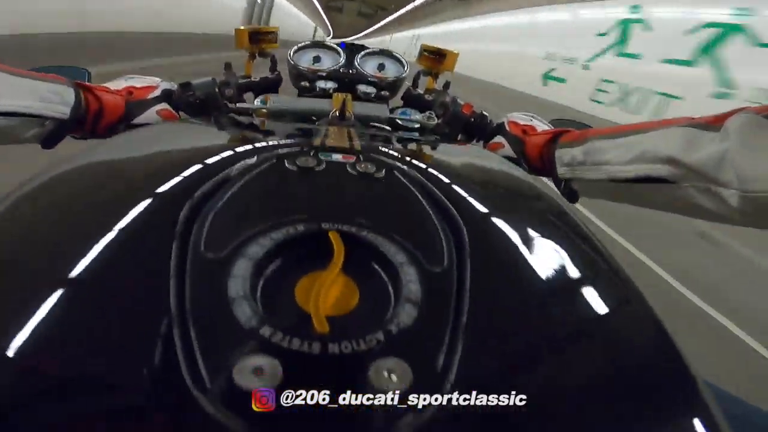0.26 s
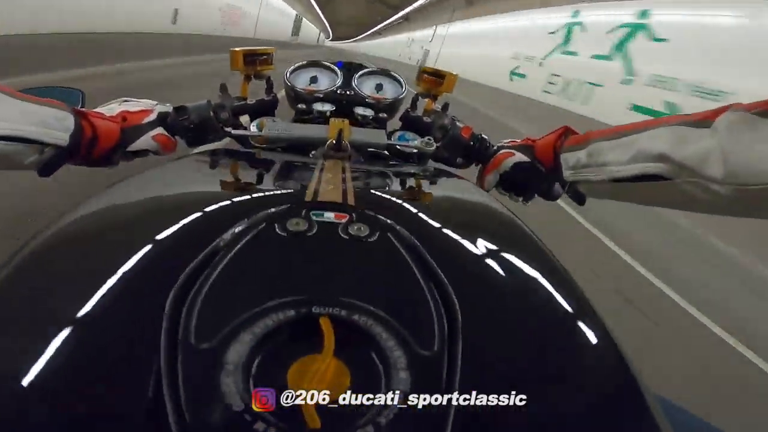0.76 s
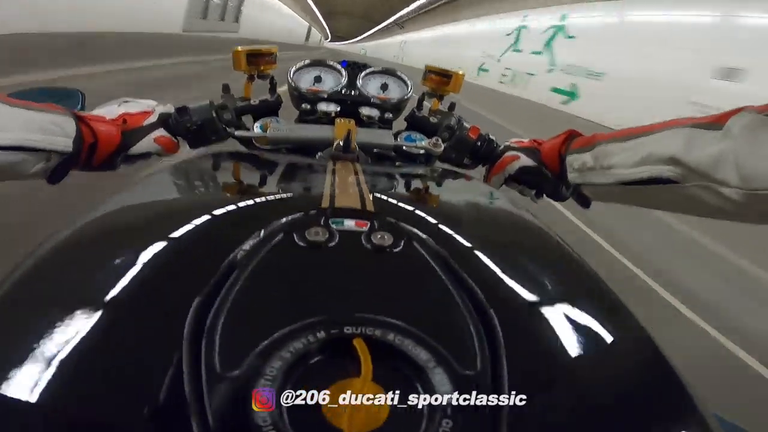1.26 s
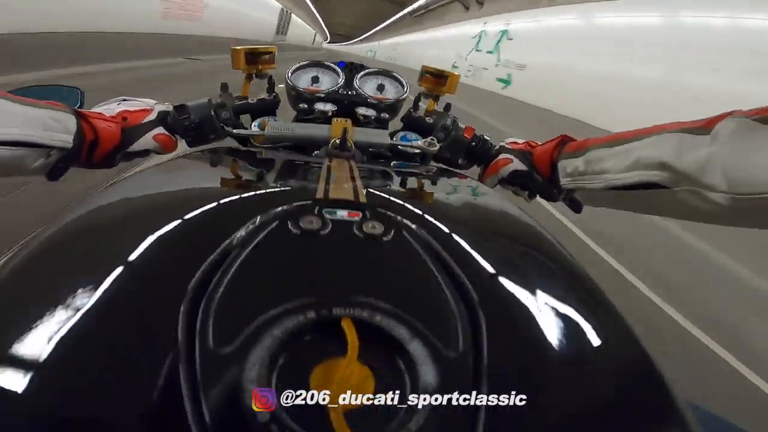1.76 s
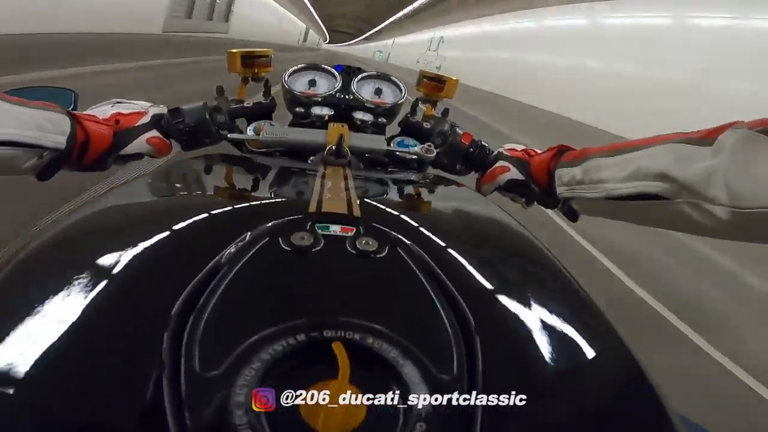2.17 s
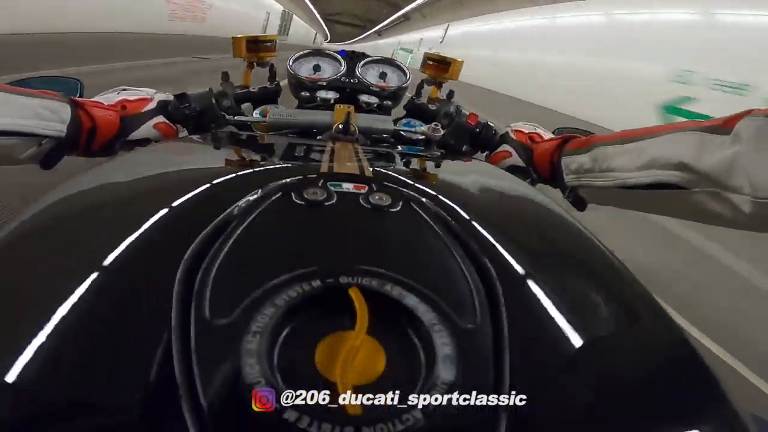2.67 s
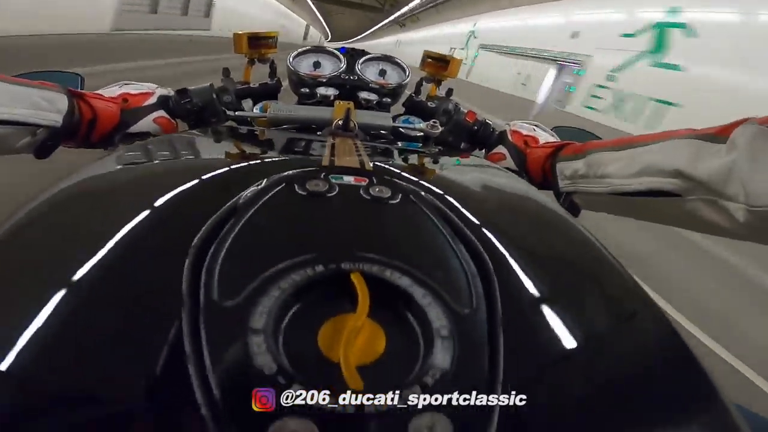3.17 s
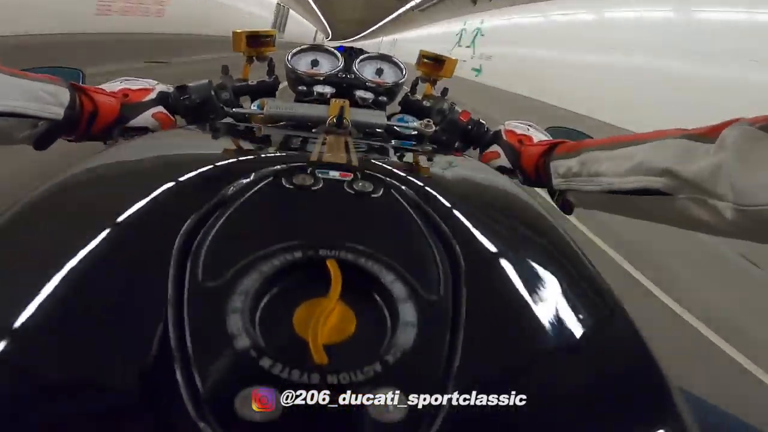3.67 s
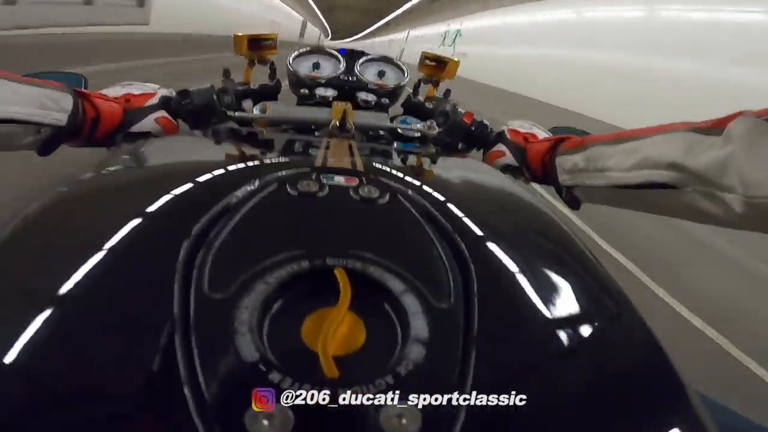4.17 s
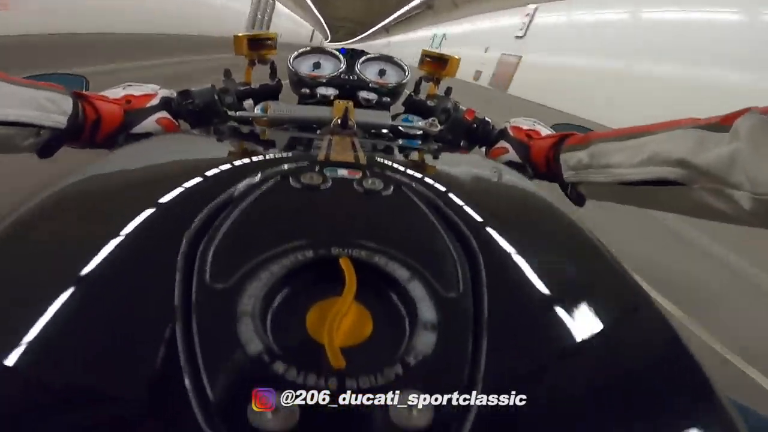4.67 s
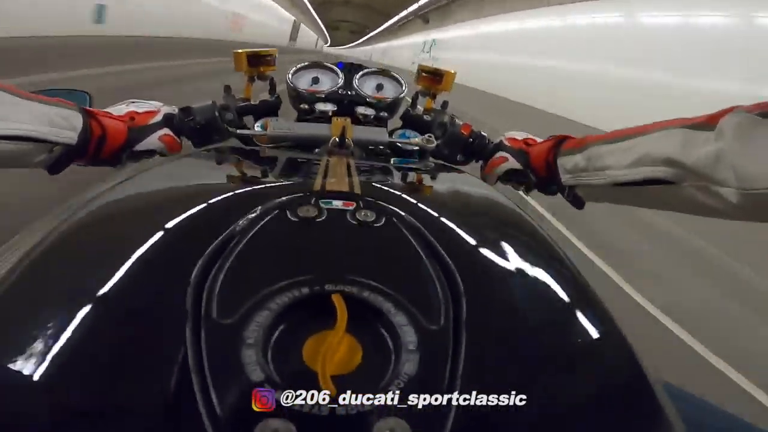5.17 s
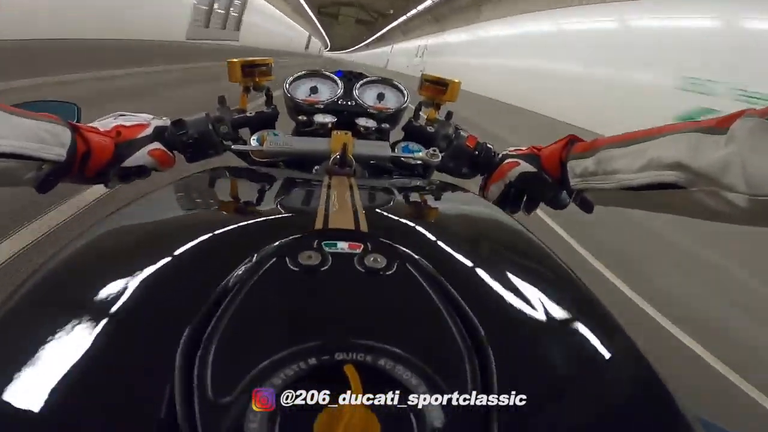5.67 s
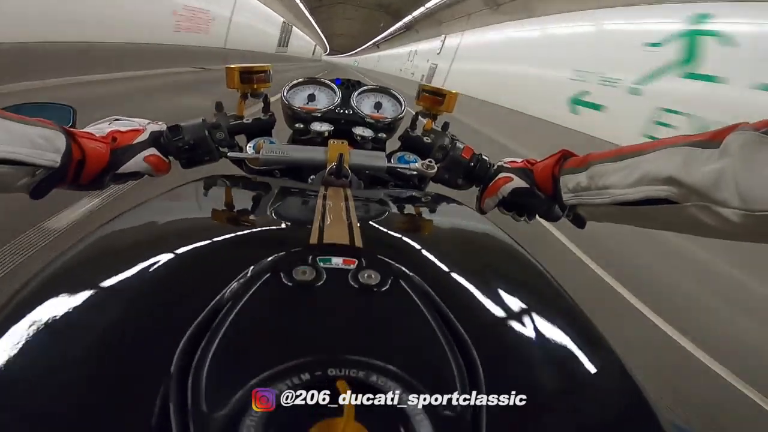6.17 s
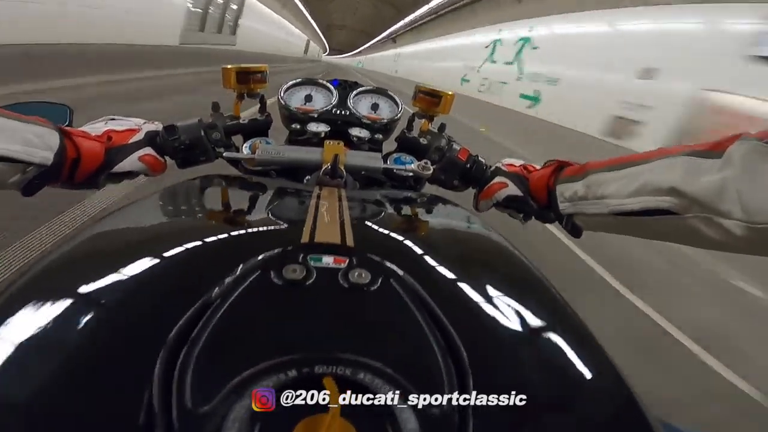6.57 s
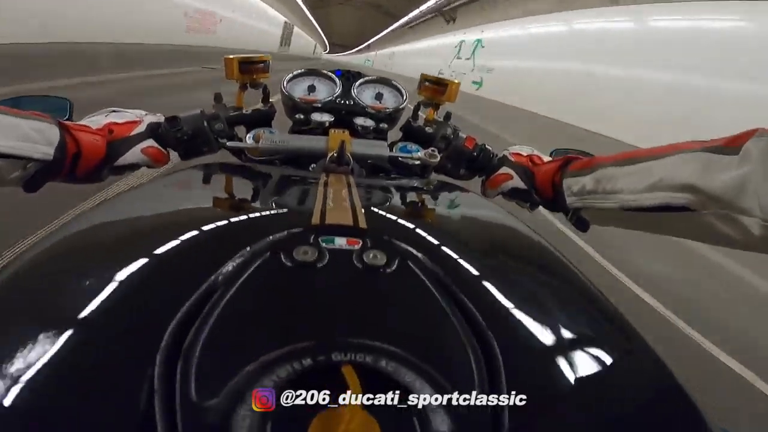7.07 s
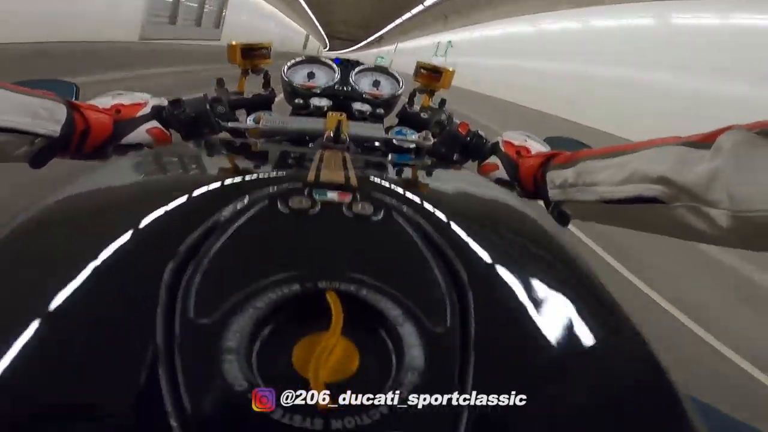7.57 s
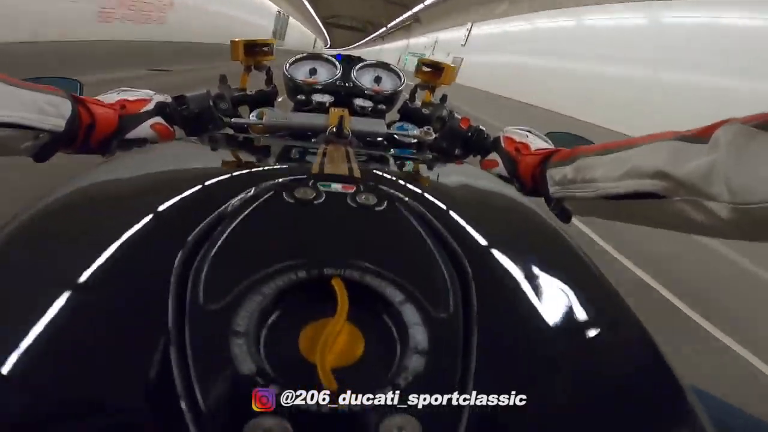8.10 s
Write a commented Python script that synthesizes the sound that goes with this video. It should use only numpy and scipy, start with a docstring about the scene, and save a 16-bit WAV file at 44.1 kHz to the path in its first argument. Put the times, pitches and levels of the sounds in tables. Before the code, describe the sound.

A twin-cylinder motorcycle surges on and off the throttle in a road tunnel, raspy and droning, with exhaust pops, wind buffeting and tyre roar.

```python
"""In a road tunnel, a four-stroke V-twin motorcycle rolls on and off the throttle at speed, heard over the tank.
Engine orders are sines gliding with the revs; gated, crackling noise makes each firing rasp in the exhaust.
Shaped noise makes the wind, the tyre roar and the engine's wash off the walls.
The tunnel booms on one low tone with its octave; filtered clicks make sharp exhaust pops."""
import sys
import numpy as np
from scipy import signal
from scipy.fft import rfft, irfft
from scipy.io import wavfile
from scipy.ndimage import uniform_filter1d

SR = 44100
rng = np.random.default_rng(int(sys.argv[2]) if len(sys.argv) > 2 else 0)


def master_out(mix):
    """Clip the mix to full scale and print it as 16-bit PCM to the path in sys.argv[1]."""
    frames = np.transpose(np.atleast_2d(mix))
    ceiling = np.clip(frames, -1, 1)
    pcm = np.round(ceiling * 32767).astype(np.int16)
    wavfile.write(sys.argv[1], SR, pcm)


def makeup_ratio(level_db):
    """Linear amplitude ratio for a level in decibels (20 dB per factor of ten)."""
    decades = np.asarray(level_db, float) / 20
    return 10 ** decades


N = 367794
TIME = np.arange(N) / SR
BLOCK = 256  # samples per control value

# Engine speed; one cycle is two crank turns. Each row: time in seconds, cycles per second in Hz.
CYCLE_RATE = [(0, 55.3), (.3, 56.4), (.55, 56.6), (.76, 55.3), (1.46, 52.8), (2.14, 50.5), (2.6, 50),
              (3, 50.3), (3.92, 53.6), (4.6, 55.3), (5.24, 56.45), (5.7, 54.4), (6.35, 52.1), (6.9, 50.2),
              (7.4, 50), (7.6, 50.35), (8.34, 52.95)]
BOOM_HZ = 200.6
HISS_WAVER_DB, HISS_WAVER_HZ = 1.0, 6  # rasp and wall wash swell and sink a little


def evened(x):
    """Scales to unit rms."""
    return x / np.sqrt(np.mean(x ** 2) + 1e-20)


def read(points, hz):
    """Interpolates a spectrum over log frequency."""
    f, value = np.transpose(points)
    return np.interp(np.log(hz + 1), np.log(f + 1), value)


def cycle_hz():
    """Engine cycles per second at every sample."""
    return np.interp(TIME, *np.transpose(CYCLE_RATE))


def slow(corner_hz, count):
    """Rows of slow chance, fading out above corner_hz, one value per block."""
    size = N // BLOCK + 8
    z = rfft(rng.standard_normal((count, size)))
    hz = np.fft.rfftfreq(size, BLOCK / SR)
    return evened(irfft(z / (1 + (hz / corner_hz) ** 4), size))


def spread(row):
    """Interpolates block values to samples."""
    return np.interp(TIME, np.arange(len(row)) * BLOCK / SR, row)


def waver(corner_hz):
    """One slow random curve at the sample rate."""
    return spread(slow(corner_hz, count=1)[0])


def colour(x, points):
    """Causal minimum-phase filter with the given spectrum."""
    log_gain = np.log(makeup_ratio(read(points, abs(np.fft.fftfreq(8192, 1 / SR)))))
    min_phase = np.exp(log_gain - 1j * signal.hilbert(log_gain).imag)
    taps = np.fft.ifft(min_phase).real[:4096]
    return signal.oaconvolve(x, taps)[:N]


def noise(points, patchy_db):
    """Unit-rms noise from random short-time spectra with louder and softer patches."""
    a, b, patches = rng.standard_normal((N // 512 + 6, 1025, 3)).T
    patches = uniform_filter1d(patches, 8, 0)  # over frequency
    patches = evened(uniform_filter1d(patches, 6, 1))  # over time
    shape_db = read(points, np.fft.rfftfreq(2048, 1 / SR))[:, None]
    z = (a + 1j * b) * makeup_ratio(shape_db + patchy_db * patches)
    return evened(signal.istft(z, nperseg=2048, noverlap=1536)[1][:N])


def throttle(feather=0.27):
    """Opening: snatched open, rolled on, eased off, snapped nearly shut, then slowly closed."""
    # Twists of the grip. Each row: opens in seconds, shuts in seconds, opening it rolls towards (1 = full).
    twists = [(-.8, .545, 1.17), (2.63, 5.32, 1.05), (7.27, 9.0, 1.1)]
    coast, snatch = 0.012, 0.55  # openings
    wrist_s, roll_on_s, ease_per_s = 0.045, 0.37, 0.097
    feather_s = 0.5  # the share 'feather' is given back over this time before shutting
    linger, linger_s = 0.16, 0.63  # the last opening is let go slowly
    out = np.full(N, coast)
    for opens_s, shuts_s, widest in twists:
        since = np.maximum(TIME - opens_s, 0)
        opened = np.clip((TIME - opens_s) / wrist_s + 0.5, 0, 1)
        shut = np.clip((TIME - shuts_s) / wrist_s + 0.5, 0, 1)
        held = widest - (widest - snatch) * np.exp(-since / roll_on_s) - ease_per_s * since
        held *= 1 - feather * np.clip(1 + (TIME - shuts_s) / feather_s, 0, 1)
        left = coast + linger * np.exp(-np.maximum(TIME - shuts_s, 0) / linger_s)
        out += opened * (held + shut * (left - held) - out)
    return out


def pulse_phase(k):
    """Phase of order k from two uneven firings; low orders trail, high ones ring."""
    second_db, second_late = -2.5, 0.65  # far cylinder against near; delay in cycles
    thump_lag = 0.085  # cycles by which the six low orders trail
    ring_order, ring_width = 11.5, 2.8  # each pulse rings briefly around this order
    pair = np.angle(1 + makeup_ratio(second_db) * np.exp(-2j * np.pi * k * second_late))
    if k < 7:
        return pair - 2 * np.pi * k * thump_lag
    return pair - np.arctan((k - ring_order) / ring_width)


def orders(turns, burn):
    """Sines on multiples of the cycle, each wavering at random in level and phase, more so when coasting."""
    # Orders 1, 2, 3 .. before resonance and waver. Each row: level shut in dB, level open in dB.
    order_levels = [(-31.5, -27), (-32.5, -29.5), (-27.5, -38), (-26.5, -32.5), (-27, -28), (-27.5, -29),
                    (-47, -41), (-43, -31.5), (-40, -36.5), (-39, -43.5), (-47, -30), (-45.5, -30),
                    (-53, -42.5), (-48.5, -40), (-52.5, -41), (-58, -44), (-66.5, -38), (-63.5, -44.5),
                    (-63.5, -40), (-65.5, -41), (-77, -40), (-62, -46.5), (-64.5, -45), (-68, -55.5),
                    (-63.5, -54.5), (-60, -49.5)]
    # Exhaust and body resonances the orders glide through. Each row: centre in Hz, width in Hz, gain in dB.
    resonances = [(51.2, 3.7, -10.5), (53.6, 1.3, 8.5), (153.16, 2, 5.5), (162, 12, 2.5),
                  (216.3, 2.3, -3.5), (228.13, 3.06, 14.5), (248.6, 8.7, -10), (277.4, 4.3, -8.5),
                  (299, 6.3, -10), (313, 1.3, 1), (338.5, 7.7, -2), (354.6, 14, 7), (403, 7.7, 12.5),
                  (398.6, 10, -4.5), (516, 15, -13), (560, 7.1, -3.5), (562, 8, 4), (606.2, 5.3, 3),
                  (695, 6.3, 1.5), (777, 24, 3), (950, 15, 6), (1057, 26, -4.5), (1120, 15, 5),
                  (1180, 25, -1)]
    boom_width_hz = 4
    waver_db, drift_rad, uneven_db = 1.1, 0.1, 0.4
    jitter = 0.003  # cycles: the crank hurries and lags a little
    crack_at = 0.175  # where in the cycle the sharp pulse comes
    scatter_rad = 0.65  # echoes off road and walls shift each order's phase
    steep = 0.11  # above the twelfth, each higher order needs a wider throttle
    count = len(order_levels)
    hz = cycle_hz()[::BLOCK]
    load = throttle()[::BLOCK]
    growl = throttle(feather=0.12)[::BLOCK]  # low orders almost hold until the throttle shuts
    wander = slow(8.3, count=2 * count)[:, :len(hz)]
    echoes = scatter_rad * slow(0.7, count=count)[:, :len(hz)]
    cycle_db = uneven_db * np.interp(turns - 1 / 4, np.arange(len(burn)), burn)
    turns = turns + jitter * waver(19)
    out = np.zeros(N)
    rows = zip(order_levels, wander[::2], wander[1::2], echoes)
    for k, ((shut_db, open_db), level, lag, echo) in enumerate(rows, 1):
        high = max(k - 12, 0)
        # coasting breaks up the orders; those above the twelfth always waver more
        broken = 1 + 1.2 * np.clip(1 - load, 0, 1) + 0.07 * high
        opening = (load if k > 12 else growl) ** (1 + steep * high)
        db = shut_db + (open_db - shut_db) * opening + waver_db * broken * level
        for centre_hz, width_hz, gain_db in resonances:
            db += gain_db * np.exp(-((k * hz - centre_hz) / width_hz) ** 2)
        size = makeup_ratio(db)
        for m in (1, 2):  # the boom swallows an order on its note or octave
            size = size * (1 - np.exp(-((k * hz / m - BOOM_HZ) / boom_width_hz) ** 2))
        sharp = makeup_ratio(cycle_db * min(k / 8, 1))  # a strong burn lifts the high orders most
        phase = pulse_phase(k) + spread(drift_rad * broken * lag + echo)
        out += np.sqrt(2) * spread(size) * sharp * np.cos(2 * np.pi * k * (turns - crack_at) + phase)
    return out


def crackle():
    """Random gain held for one spark at a time."""
    spark, crackle_db = 30, 3  # samples per spark; dB per unit of chance
    chance = rng.exponential(1, N // spark + 1)
    return makeup_ratio(crackle_db * np.minimum(np.repeat(chance, spark)[:N], 3))


def rasp(turns, burns):
    """A crackling puff of gas noise at each firing, no two alike, growing with the throttle."""
    # Exhaust gas, near then far cylinder, before throttle gain.
    # Each row: spectrum as (Hz, relative dB per Hz) pairs, level in dB.
    gas = [([(200, -32), (500, -8.5), (1000, -6), (1400, -9), (2000, -17), (3200, -24.5), (6300, -44),
           (13000, -83)], -41), ([(300, -21), (1000, -6), (2000, -9), (3200, -12), (5000, -21),
           (7500, -33.5), (11000, -60.5), (15000, -80)], -48.5)]
    leaves_at, fade_cycles = (0.12, 0.78), (0.065, 0.11)  # cycles, by cylinder
    out = np.zeros(N)
    for late, (points, db), fade, burn in zip(leaves_at, gas, fade_cycles, burns):
        since = (turns - late) % 1
        firing = np.floor(turns - late).astype(int) % len(burn)
        size = makeup_ratio(0.8 * burn)[firing]
        gate = size * crackle() * since * np.exp(-since / fade)
        out += makeup_ratio(db) * evened(colour(gate * rng.standard_normal(N), points))
    gain = np.clip(throttle() + 0.099, 0, 2) ** 2.7
    return gain * out * makeup_ratio(HISS_WAVER_DB * waver(HISS_WAVER_HZ))


def wind():
    """Lumpy low buffeting at the microphone, in gusts that come by chance."""
    # Wind, then the deepest buffeting. Each row: frequency in Hz, relative dB per Hz.
    wind_shape = [(30, -27), (50, 8.5), (70, 9.5), (110, 1.5), (180, 1.5), (300, -12), (600, -47),
                  (2000, -120)]
    buffet_shape = [(10, -28.5), (22, -8), (35, -6.5), (46, 3.5), (70, -28), (120, -63), (500, -120)]
    wind_db, gust_db, gust_hz = -25.5, 1, 20  # mean level, depth, pace
    buffet_db, thump_db, thump_hz = -37.5, 3, 5
    gusts = makeup_ratio(wind_db + gust_db * waver(gust_hz))
    thumps = makeup_ratio(buffet_db + thump_db * waver(thump_hz))
    return gusts * noise(wind_shape, patchy_db=1.0) + thumps * noise(buffet_shape, patchy_db=3.0)


def echoed(load, hang_s=1.0):
    """One-pole lag: the tunnel keeps the loud engine ringing after the throttle shuts."""
    r = np.exp(-1 / (hang_s * SR))
    return signal.lfilter([1 - r], [1, -r], load, zi=[load[0] * r])[0]


def road():
    """Tyre roar, and the blurred engine coming back off the walls as noise."""
    # Tyres and tunnel, then engine blurred by the tunnel. Each row: frequency in Hz, relative dB per Hz.
    roar_shape = [(76, -37.5), (130, -5.5), (170, -6.5), (258, -10), (314, -11.5), (370, -12.5),
                  (500, -19.5), (860, -26.5), (1400, -27.5), (1900, -34), (2700, -39), (4000, -49),
                  (6300, -61), (9000, -74.5), (13000, -92.5), (15000, -102)]
    walls_shape = [(200, -24), (400, 0), (650, -2.5), (1000, -5.5), (1500, -16), (2400, -18.5),
                   (4000, -29.5), (6500, -43.5), (9000, -57.5), (14000, -86.5)]
    roar_db, walls_db = -27.5, -31.5  # walls: at opening 1
    wash = makeup_ratio(walls_db + HISS_WAVER_DB * waver(HISS_WAVER_HZ)) * echoed(throttle())
    walls = wash * noise(walls_shape, patchy_db=1.5)
    return makeup_ratio(roar_db) * noise(roar_shape, patchy_db=1.5) + walls


def boom():
    """One low tone: the fourth order sinks onto it, it swells, and rings on after the order leaves."""
    # Swells of the note. Each row: start in seconds, release in seconds, first level in dB, top level in dB.
    swells = [(1.801, 3.198, -23.5, -15), (6.45, 7.703, -23, -14.5)]
    rise_s, fall_s, drop_db, fade_db_per_s = 0.29, 0.015, -6.5, -7.5
    waver_db, waver_hz = 0.9, 6
    octave_lead_s, octave_fall_s = 0.13, 0.068  # the octave lets go before the note, more gently
    out = np.zeros(N)
    # octave against note, throttle shut and open: hard pulses sharpen its crests
    octave_gain = makeup_ratio(np.interp(throttle(), [0, 1], [-23.5, -3]))
    for start_s, release_s, first_db, top_db in swells:
        after = np.maximum(TIME - release_s, 0)
        db = np.interp(TIME, [start_s, release_s], [first_db, top_db])
        db += waver_db * waver(waver_hz)
        db += drop_db * (1 - np.exp(-after / fall_s)) + fade_db_per_s * after
        octave_after = np.maximum(TIME - release_s + octave_lead_s, 0)
        octave = octave_gain * np.exp(-octave_after / octave_fall_s)
        # pitch only falls, down to the boom
        sinking = np.minimum.accumulate(np.where(TIME > start_s, 4 * cycle_hz(), SR))
        phase = 2 * np.pi * np.cumsum(np.maximum(sinking, BOOM_HZ)) / SR
        rise = np.clip((TIME - start_s) / rise_s, 0, 1)
        out += np.sqrt(2) * rise * makeup_ratio(db) * (np.cos(phase) + octave * np.cos(2 * phase))
    return out


def pops():
    """Exhaust pops: a bright click with a short tail of noise over a dull knock."""
    # Each row: time in seconds, drive level in dB, extra drive of the knock in dB.
    bangs = [(2.821, -40.5, 15), (3.2033, -28.5, 6.5), (3.2267, -25, 10), (3.3743, -33.5, 6),
             (3.8687, -30, 1.5), (4.0178, -36.5, 4.5), (7.0884, -33, 21), (7.6825, -39, 6),
             (7.8197, -36.5, 5), (8.0377, -28.5, 6), (8.092, -28.5, 3), (8.1492, -35, 3),
             (8.186, -32, 11.5), (8.2113, -36.5, 8), (8.281, -35, 6)]
    # Bright edge, then dull body. Each row: frequency in Hz, gain in dB.
    edge_shape = [(300, -10), (2000, 5), (3000, 4), (5000, -9), (8000, -40), (11000, -90)]
    body_shape = [(150, -14), (500, 0), (1400, 2), (2400, -8), (5000, -45), (10000, -100)]
    tail_s = 0.0018
    edge, body, grit = np.zeros(N), np.zeros(N), rng.standard_normal(N)
    for s, db, body_db in bangs:
        at = round(s * SR)
        edge += makeup_ratio(db) * (TIME > s) * np.exp(-np.maximum(TIME - s, 0) / tail_s) * grit
        edge[at] += 3 * makeup_ratio(db)
        body[at] -= 7 * makeup_ratio(db + body_db)
    return colour(edge, edge_shape) + colour(body, body_shape)


def scene():
    """All sources meet at one microphone."""
    turns = np.cumsum(cycle_hz()) / SR  # engine cycles so far
    burns = rng.standard_normal((600, 2)).T  # strength of each firing, by cylinder
    engine = orders(turns, burns[0]) + rasp(turns, burns)
    return (engine + wind() + road() + boom() + pops())[None]


def low_pass(x):
    """Removes everything above the highest recorded frequency."""
    return signal.sosfilt(signal.butter(12, 13890, fs=SR, output="sos"), x)


def record(dry):
    """The microphone drops the deepest bass, below 24 Hz."""
    low_cut = signal.butter(2, 24, "high", fs=SR, output="sos")
    return low_pass(signal.sosfilt(low_cut, dry))


dry = scene()
out = record(dry)
master_out(out)
```